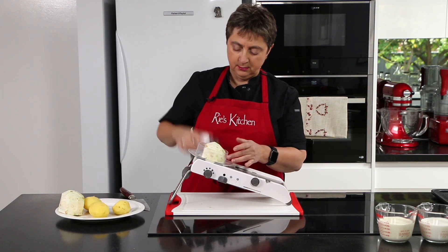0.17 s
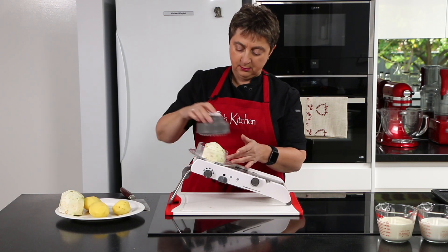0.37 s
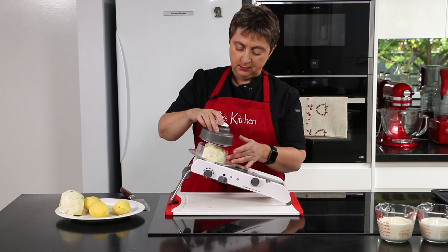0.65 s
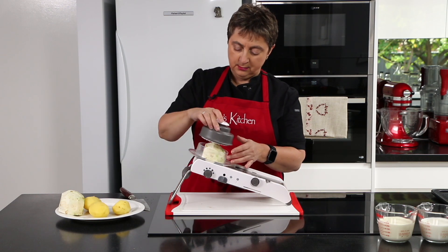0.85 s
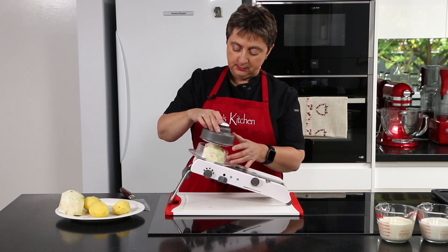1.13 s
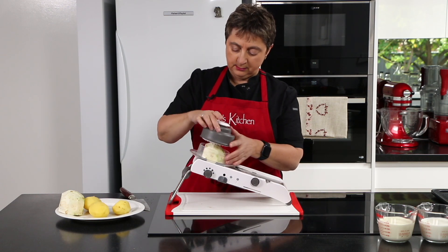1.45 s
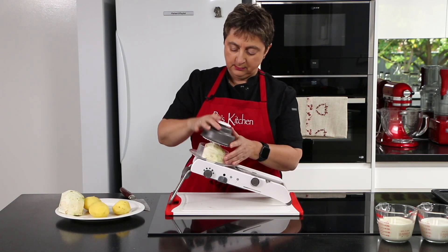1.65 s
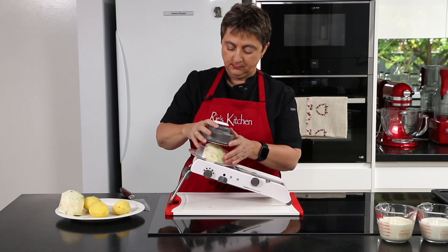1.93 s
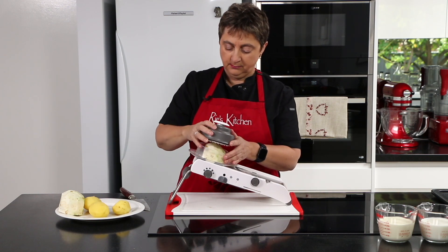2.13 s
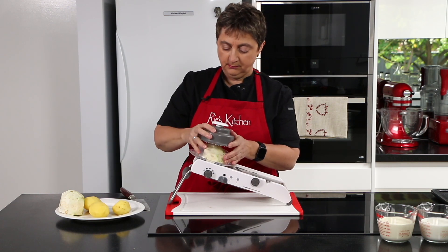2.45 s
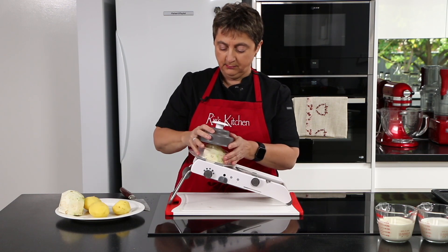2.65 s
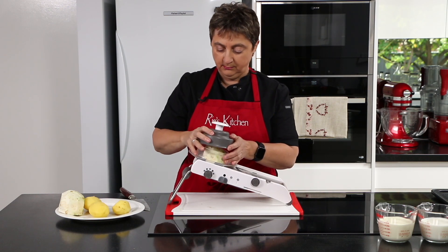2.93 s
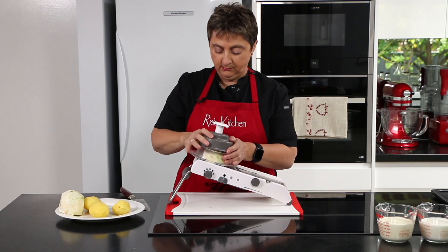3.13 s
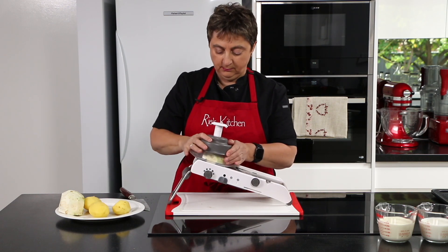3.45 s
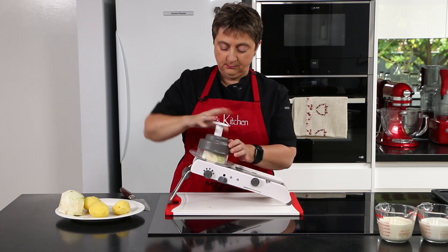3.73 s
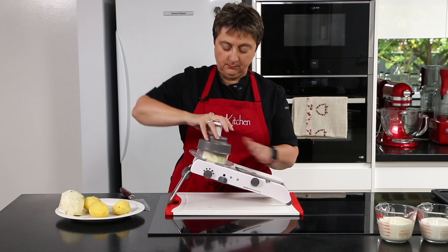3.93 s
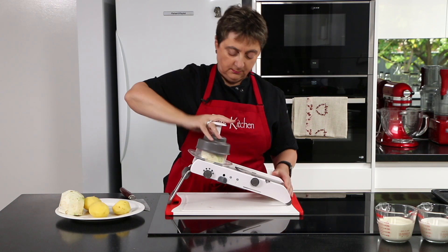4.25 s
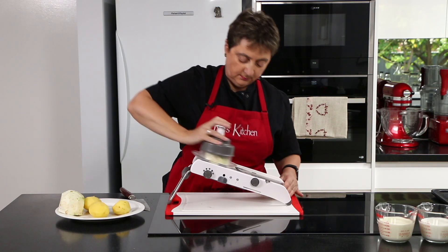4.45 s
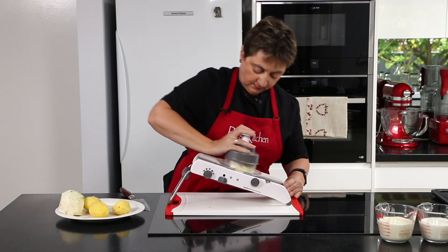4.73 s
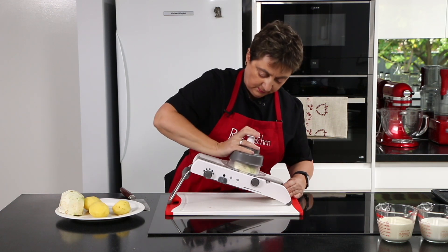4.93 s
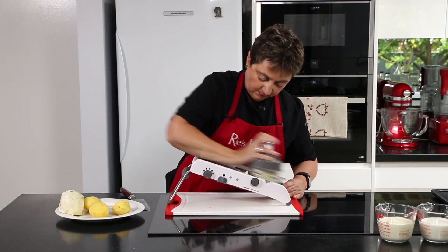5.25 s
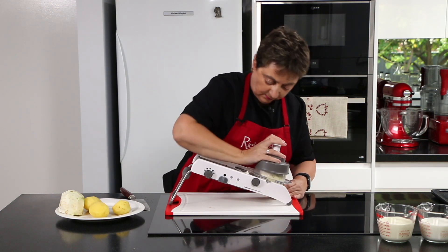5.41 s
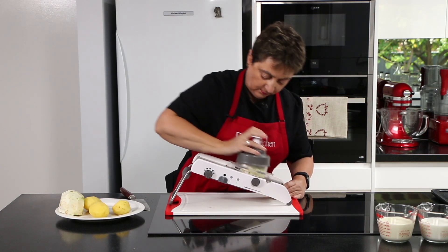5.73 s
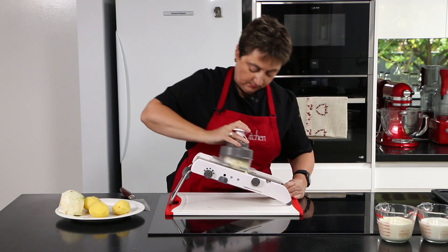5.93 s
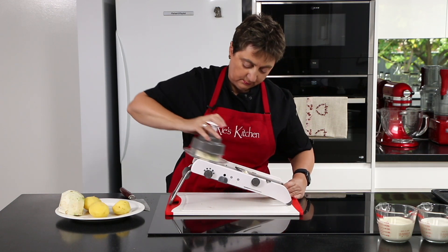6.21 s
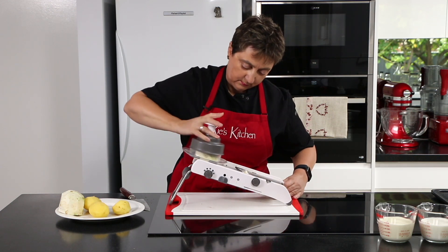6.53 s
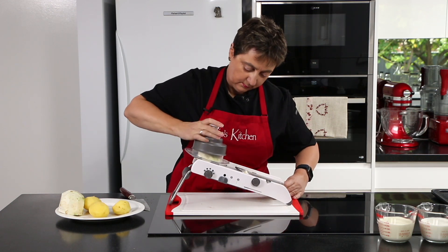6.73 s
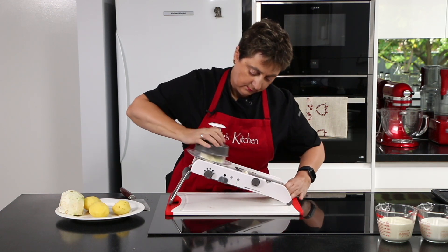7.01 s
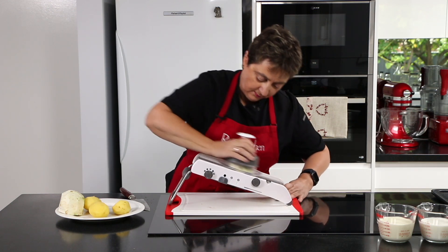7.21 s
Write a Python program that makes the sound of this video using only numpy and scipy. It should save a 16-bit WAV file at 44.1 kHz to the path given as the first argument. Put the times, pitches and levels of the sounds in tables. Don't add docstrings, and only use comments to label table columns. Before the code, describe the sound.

A quiet kitchen with a low, distant appliance hum and short hard-walled reverberation, heard closely. From 0 to 0.3 s a root vegetable slips softly on plastic; a clear click comes at 0.54, then very faint fingertip strokes around 0.9-1.2. A loud hollow plastic knock lands at 1.74, with light taps near 2.1 and a small skid at 2.55. Another slip at 3.03 precedes a loud scrape and snap at 3.35-3.37 as the guard is pressed on. From 3.8 to 5.1 small grip rattles mix with soft rubbing, growing raspier after 4.6. At 5.15-5.45 the push comes: sharp ticks, gritty rasp, very loud crunching knocks and low counter thuds. Crackles and knocks continue, standing out at 5.75, thinning by 6.4. Light clicks at 6.5-6.7 lead to a loud scraping clack at 6.86, then rattles and a rough bite at 7.25, with taps to the end.

```python
import sys
import numpy as np
from scipy import signal
from scipy.fft import rfft, irfft, next_fast_len
from scipy.io import wavfile
from scipy.ndimage import uniform_filter1d, map_coordinates

SR = 44100
rng = np.random.default_rng(int(sys.argv[2]) if len(sys.argv) > 2 else 0)


def digitize_waveform(pressure):
    field = np.atleast_2d(pressure).T
    bounded = np.clip(field, -1, 1)
    quanta = np.round(bounded * 32767).astype(np.int16)
    wavfile.write(sys.argv[1], SR, quanta)


def invert_db(x):
    u = np.asarray(x, float) / 20
    return 10 ** u


N = 325017


def unit(x):
    return x / np.sqrt(np.mean(x ** 2) + 1e-20)


def along(points, hz):
    f, v = np.transpose(points)
    return np.interp(np.log(hz + 1), np.log(f + 1), v)


def wobble(rate):
    knots = rng.standard_normal(int(N * rate / SR) + 4)
    return map_coordinates(knots, [np.arange(N) * rate / SR])


def filtered(x, response):
    m = next_fast_len(len(x) + 8192)
    return irfft(rfft(x, m) * response(np.fft.rfftfreq(m, 1 / SR)), m)[:len(x)]


def resonances(modes, f):
    total = 0
    for k, (centre, width, db) in enumerate(modes):
        damping = 1j * f * width
        total = total + (-1) ** k * invert_db(db) * damping / (centre ** 2 - f * f + damping + 1e-9)
    return total


def band(lo_hz, hi_hz):
    def response(f):
        rise = -f * f / (lo_hz ** 2 - f * f + 1.4j * f * lo_hz)
        fall = hi_hz ** 2 / (hi_hz ** 2 - f * f + 1.4j * f * hi_hz)
        return (rise * fall) ** 2
    return response


def lumps(t, depth_db):
    jumps = np.clip(rng.standard_normal(len(t) // 64), -1.5, 1.5)
    return invert_db(depth_db * jumps).repeat(64)


def blow(t, t60):
    return (1 - np.exp(-t / .0003)) * (invert_db(-60 * t / t60) + .6 * invert_db(-60 * t / .006))


def crunch(t, t60):
    return blow(t, t60) * lumps(t, depth_db=5) ** (t / (t + .004))


def skid(t, length):
    swell = np.sin(np.pi * np.clip(t / length, 0, 1)).clip(0) ** 0.54
    return swell * lumps(t, depth_db=3.5)


def rattling(rows, t60, halving_db):
    return [(*row, t60 * 2 ** (row[1] / halving_db)) for row in rows]


def rung(rows):
    return [(*row, 2500, length) for *row, length in rows]


def contacts(rows, body, shape, between_db, ring_db, loose):
    out, t = np.zeros(N + SR), np.arange(8192) / SR
    f = np.fft.rfftfreq(len(t), 1 / SR)
    registers = np.array([band(250, 1000)(f), band(1000, 4000)(f), band(4000, 11000)(f)])
    for s, db, dull_db, bright_db, hz, life in rows:
        force = shape(t, np.clip(life, .003, .17))
        burst = rfft(force * rng.standard_normal(len(t)))
        for _ in range(4):
            burst = rfft(force ** 0.26 * irfft(burst / np.abs(burst)))
        grip = loose * rng.standard_normal((len(body), 2))
        modes = [(c * (1 + d), max(w, c / 45), level + 40 * e) for (c, w, level), (d, e) in zip(body, grip)]
        modes.append((hz, hz * .06, ring_db))
        colour = invert_db(10 * loose ** .5 * map_coordinates(rng.standard_normal(40), [f / 700]))
        response = resonances(modes, f) + invert_db(between_db)
        parts = irfft(burst * colour * registers * response)
        parts *= t < .18
        peaks = invert_db(db - 1.5 + np.array([[dull_db], [0], [bright_db]]))
        parts *= peaks / np.abs(parts).max(axis=1, keepdims=True)
        out[round(s * SR):][:len(t)] += parts.sum(axis=0)
    return out[:N]


# (time [s], peak [dB], dull part [dB], bright part [dB], ring [Hz])
SLICE_TAPS = [(5.1516, -22, -5.5, -61, 2110), (5.3168, -12, -9, -15, 2480), (5.3218, -1.5, -13, -7.5, 2750),
              (5.359, -11, -4, -12.5, 2300), (5.3546, 1, -7.5, -5.5, 1312), (5.4124, -28, 12.5, 5, 692),
              (5.5593, -21, -6, -4.5, 3900), (5.5852, -27, -3, -38.5, 3000),
              (5.6028, -15, -8.5, -4.5, 2900), (5.6057, -18, 0, -18, 1050), (5.6158, -32, 4, -2, 960),
              (5.7071, -22.5, -6, -10, 2580), (5.7532, -8.5, -3.5, -0.5, 1430), (5.761, -23.5, 4, -8, 3400),
              (5.8124, -17, 5, 0.5, 1550), (5.92, -22, -5, -10, 1190), (5.9265, -25, -16, -11, 2100),
              (5.975, -29, -5, -12, 2400), (6.0033, -32, -8, -12, 2400), (6.0115, -22, -12, -5, 2500),
              (6.0305, -24, 0, -5.5, 2300), (6.039, -32, -2, -17, 800), (6.066, -31, -4, -3.5, 2580),
              (5.9487, -15, -12, -1.5, 890), (6.022, -14.5, -13, -1.5, 740),
              (6.0775, -17, -12.5, -4.5, 2300), (6.0927, -20, -13, -0.5, 920),
              (6.1802, -26.5, -3, -40, 896), (6.2281, -24.5, -6.5, -12.5, 1390),
              (6.2667, -31, 2.5, -33, 740), (6.2922, -32.5, -4, -6, 4740), (6.378, -36.5, -0.5, -8, 4560),
              (5.223, -18, -3, -10, 2900), (5.2481, -22, -9, -8, 1910), (5.2725, -12.5, -5, -10, 1860),
              (5.382, -23, -6, -6, 2300)]
# (centre [Hz], width [Hz], level [dB])
RAMP = [(645, 320, -4), (1400, 630, 8), (2635, 1470, 5), (4390, 1600, 16), (5530, 6600, 9.5)]


def slicing_taps():
    rows = rattling(SLICE_TAPS, t60=.057, halving_db=30.5)
    return contacts(rows, RAMP, crunch, between_db=-4, ring_db=11.5, loose=.05)


# (time [s], peak [dB], dull part [dB], bright part [dB], length [s])
BITES = [
    (5.7465, -17.5, -4, -7, 0.0048),
    (5.772, -34, 5.5, -15.5, 0.029),
    (5.953, -20, -6, -7, 0.012),
    (6.08, -23, -1, -3, 0.02),
    (7.24, -14.5, -5.5, -5, 0.029),
    (7.266, -21, -10, -5, 0.05),
]


def bites():
    return contacts(rung(BITES), RAMP, skid, between_db=0, ring_db=-40, loose=.05)


# (middle [s], length [s], rasp [dB], hiss over rasp [dB], drag over rasp [dB])
STROKES = [(0.05, 0.41, -57.5, -7.5, 9.5), (0.468, 0.35, -58.5, -3.5, 0.5), (2.415, 0.65, -67.5, 0.5, 5.5),
           (3.75, 0.72, -62, -8, -2), (4.02, 0.4, -51.5, -2.5, 3), (4.31, 0.32, -53.5, -6, 2),
           (4.616, 0.21, -37, -5, -3), (4.835, 0.12, -36.5, -4.5, -6), (5.004, 0.24, -51, -6, 4.5),
           (5.223, 0.15, -37.5, -4.5, -14), (5.31, 0.23, -35.5, -2, 5), (5.445, 0.12, -57, -5, 16),
           (5.95, 0.38, -41, -24, 2.5), (6.222, 0.27, -43, -6.5, 0), (6.608, 0.29, -52.5, -10, 7.5),
           (6.852, 0.053, -39.5, -10, 2), (7.254, 0.23, -34.5, -5, -1)]
# (frequency [Hz], density [dB per Hz])
HISS = [(2060, -31), (3500, -7.5), (5870, -5), (6800, -6), (7630, -9.5), (14300, -17.5), (16100, -18)]


def grit(spiky_db):
    jumps = np.clip(rng.standard_normal(N // 40 + 1), -2, 2)
    sizes = invert_db(spiky_db * jumps).repeat(40)[:N]
    return unit(sizes * rng.standard_normal(N))


def rasp():
    time = np.arange(N) / SR
    levels = np.zeros((3, N))
    for s, length, db, hiss_db, drag_db in STROKES:
        edge_loss_db = 12 * np.abs(2 * (time - s) / length) ** 2.33
        levels += invert_db(db - 5.0 - edge_loss_db) * invert_db(np.array([[0], [hiss_db], [drag_db]]))
    judder = 2.3 * wobble(60) + 1.2 * wobble(14)
    fibres = grit(spiky_db=4.5)

    def mid_response(f):
        return (resonances([(1550, 77, -7.0), (2300, 160, 8.5)], f) + invert_db(2.0)) * band(1000, 4000)(f)

    def high_response(f):
        return invert_db(along(HISS, f)) * band(3500, 18000)(f)

    def low_response(f):
        return (resonances([(810, 75, 0.0057)], f) + invert_db(-2)) * band(200, 1000)(f)

    mid = filtered(fibres, mid_response)
    high = filtered(fibres, high_response)
    low = filtered(grit(spiky_db=4.5), low_response)
    out = np.zeros(N)
    for level, x in zip(levels, (mid, high, low)):
        out += level * unit(invert_db(judder + 1.52 * wobble(30)) * x)
    return out


# (time [s], peak [dB], dull part [dB], bright part [dB], length [s])
SLIPS = [(0.038, -35, 6, -13.5, 0.0425), (0.048, -33, -5, -19, 0.02), (0.189, -43, -15, -4.5, 0.054),
         (0.214, -47, -11, 1.5, 0.037), (0.5327, -34.5, -8, -4, 0.022), (1.52, -48.5, 2.5, -4, 0.042),
         (2.5507, -31, -2, -5.5, 0.051), (3.0313, -21, -2, -10, 0.056), (5.164, -26, -2, -29, 0.0081),
         (5.178, -33, 9, 7, 0.017), (5.2, -20.5, -8.5, -3, 0.046), (5.243, -25.5, -1, -1, 0.02),
         (5.27, -16.5, -11.5, -7, 0.03), (5.327, -23, -24, -11, 0.067), (5.9195, -31, -2, -6, 0.025)]
# (centre [Hz], width [Hz], level [dB])
SKID = [(800, 170, -0.5), (1950, 250, 3), (3900, 1100, -13.5), (5410, 670, -4.5)]


def root_slips():
    return contacts(rung(SLIPS), SKID, skid, between_db=-14, ring_db=-23, loose=.04)


# (time [s], peak [dB], dull part [dB], bright part [dB], ring [Hz])
GUARD_TAPS = [
    (0.4594, -49.5, -12, 6.5, 584),
    (0.5432, -26.5, -16, -5, 2400),
    (0.9108, -49.5, 6.5, -9, 930),
    (1.5546, -50, 7, -15, 740),
    (1.7, -68, 6, 19, 800),
    (1.739, -5, -16.5, -6, 1750),
    (2.0992, -44, -7, -23, 810),
    (2.1166, -40.5, 8.5, 4, 900),
    (2.498, -44, -25, -21, 2540),
]
# (centre [Hz], width [Hz], level [dB])
GUARD = [(645, 150, -16.5), (880, 160, 0.5), (1170, 110, -5.5), (1583, 75, 1.5), (2040, 90, -14.5),
         (2650, 130, -7.5), (3000, 140, -8), (3790, 85, 4.5), (4400, 150, -10), (5720, 400, -2.5),
         (6530, 200, -4), (7250, 140, -2.5), (8290, 170, -12.5), (9270, 200, -5.5)]


def guard_taps():
    rows = rattling(GUARD_TAPS, t60=.027, halving_db=12.6)
    return contacts(rows, GUARD, blow, between_db=-19, ring_db=-12, loose=.004)


# (time [s], peak [dB], dull part [dB], bright part [dB], ring [Hz])
PRESS_TAPS = [
    (2.8303, -39.5, -12, -5.5, 1760),
    (2.8654, -43.5, -3.5, -2, 1850),
    (3.2076, -32.5, -9, -5.5, 3200),
    (3.3674, -8, -3.5, -13.5, 740),
    (3.3704, -2, -6, -1.5, 1330),
    (3.6532, -41, -16, 5.5, 1400),
]
# (centre [Hz], width [Hz], level [dB])
PRESSED = [(383, 230, -12.5), (560, 180, -6.5), (749, 62, -0.5), (990, 160, -4), (1278, 110, -5),
           (1420, 93, 4.5), (2013, 180, -2), (2235, 66, -0.5), (2820, 720, -26), (3423, 66, -3.5),
           (3990, 165, -9.5), (4910, 200, -4), (5930, 340, -12), (8600, 1400, -11.5)]


def press_taps():
    rows = rattling(PRESS_TAPS, t60=.062, halving_db=400)
    return contacts(rows, PRESSED, blow, between_db=-20, ring_db=-3, loose=.004)


# (time [s], peak [dB], dull part [dB], bright part [dB], length [s])
PRESS_SLIPS = [
    (3.3515, -12, -2.5, -10.5, 0.038),
]


def press_slips():
    return contacts(rung(PRESS_SLIPS), PRESSED, skid, between_db=-20, ring_db=-40, loose=0)


# (time [s], peak [dB], dull part [dB], bright part [dB], ring [Hz])
GRIP_TAPS = [(3.8287, -52, -7, 9, 687), (3.8671, -19.5, -2.5, -5, 987), (3.9923, -34.5, -2.5, -18, 950),
             (4.0836, -30, -0.5, 4.5, 740), (4.2482, -33, -3, -10, 1930), (4.336, -33.5, -1, 8, 2300),
             (4.3994, -48, -1, -19, 800), (4.4767, -35, -8.5, -17, 760), (4.5106, -37.5, -15, -8, 1920),
             (4.576, -37, -2, -15, 790), (4.6573, -31, 4.5, -9.5, 870), (4.8319, -32, -15, -5, 2480),
             (4.8564, -47, -5, 14, 595), (4.9671, -54, 6, -3, 825), (5.0399, -58, -11, -15, 785),
             (5.1118, -40, -3, -9, 810)]
# (centre [Hz], width [Hz], level [dB])
GRIPPED = [(740, 74, 6.5), (1400, 240, 7.5), (2100, 300, 5), (3260, 150, 5), (4380, 410, -1.5),
           (7350, 360, -5.5)]


def grip_taps():
    rows = rattling(GRIP_TAPS, t60=.064, halving_db=43)
    return contacts(rows, GRIPPED, blow, between_db=-15.5, ring_db=11.0, loose=.015)


# (time [s], peak [dB], dull part [dB], bright part [dB], ring [Hz])
RESET_TAPS = [(6.4622, -39, -2, -5.5, 690), (6.5026, -21.5, -28, 2, 854), (6.5261, -29.5, -2, -20, 1340),
              (6.5364, -27.5, -16, 0, 850), (6.6323, -35, 6.5, -6, 790), (6.6548, -22, -6.5, -11, 750),
              (6.6752, -25, -9, -1.5, 710), (6.8508, -17, -4, -8, 2020), (6.8612, -5.5, -7.5, -9, 1150),
              (6.8785, -15, -1.5, -4, 1400), (7.0424, -48, 6, 9, 800), (7.0738, -25, -31, -9, 690),
              (7.0974, -19.5, -3, 2.5, 755), (7.104, -33.5, 5, 1, 785), (7.1432, -28, -3, -18.5, 2020),
              (7.1964, -36, -2, -15, 1420), (7.2508, -22, -1, 4, 980), (7.2572, -16.5, -4, 0.5, 1060),
              (7.29, -24, -9, -8, 3300), (7.3032, -26, -6, 2.5, 1220), (7.3145, -29, -3, 4, 1710),
              (7.366, -15.5, -3.5, -21, 746), (7.3386, -26, -15, -7, 2520), (7.358, -30, 7, -25, 795)]
# (centre [Hz], width [Hz], level [dB])
FRAME = [(737, 79, 5.5), (987, 145, 0.5), (1165, 95, -3.5), (1400, 195, 0), (1977, 540, -8),
         (2900, 170, -6.5), (4024, 330, -5.5), (5600, 480, 0.5), (8930, 1500, -24)]


def reset_taps():
    rows = rattling(RESET_TAPS, t60=.017, halving_db=130)
    return contacts(rows, FRAME, blow, between_db=-11, ring_db=8, loose=.015)


# (time [s], peak [dB], dull part [dB], bright part [dB], length [s])
FRAME_SLIPS = [
    (6.847, -6, -3.5, -5.5, 0.022),
    (6.869, -14.5, -2.5, -15.5, 0.019),
    (7.0735, -26.5, 1, -0.5, 0.024),
]


def frame_slips():
    return contacts(rung(FRAME_SLIPS), FRAME, skid, between_db=-15, ring_db=-40, loose=0)


# (time [s], peak [dB], ring [Hz], length [s])
DRAGS = [
    (.85, -56, 1550, 0.2),
    (.95, -56.5, 1463, 0.35),
    (1.04, -61.5, 1550, 0.088),
    (2.47, -50.5, 1950, 0.059),
]


def finger_drags():
    dull_db, bright_db = -15, -22
    rows = [(s, db, dull_db, bright_db, hz, length) for s, db, hz, length in DRAGS]
    return contacts(rows, [], skid, between_db=-22, ring_db=0, loose=0)


# (time [s], peak [dB], pitch [Hz], t60 [s])
PIPS = [(.052, -40, 788, 0.2), (.05, -34, 343, 0.089), (3.977, -38, 150, 0.054),
        (0.059, -34.5, 1950, 0.045), (0.543, -32.5, 2365, 0.062), (0.542, -32, 2980, 0.015),
        (.546, -41, 900, 0.13), (2.575, -45, 895, 0.35), (0.543, -32.5, 3650, 0.034),
        (0.543, -30, 3940, 0.034), (2.099, -40, 1850, 0.043), (2.099, -41, 2300, 0.026),
        (4.249, -35, 1550, 0.03), (4.249, -39, 2200, 0.03), (5.1652, -7, 2140, 0.005),
        (5.785, -28, 800, 0.049), (5.83, -28, 784, 0.1), (6.283, -29, 2150, 0.013),
        (6.503, -23, 4870, 0.014), (6.527, -31, 4800, .012), (6.655, -30, 5600, .012),
        (4.658, -31, 2700, .015), (4.577, -40, 2000, .012), (7.075, -26, 4960, 0.012),
        (7.089, -26, 4930, 0.017), (7.242, -23.5, 2700, 0.023), (2.099, -41.5, 840, 0.099),
        (3.005, -35, 886, 0.095), (3.868, -31, 1010, 0.16), (3.867, -40, 3190, 0.1),
        (5.162, 5, 2160, 0.0032), (5.188, -1.5, 2120, 0.0041), (5.2102, 0, 2100, 0.0028),
        (5.815, -19.5, 1596, 0.045), (6.307, -30, 2180, 0.024), (6.38, -40, 743, 0.1),
        (6.862, -3, 5850, 0.0085)]


def pips():
    out, t = np.zeros(N + SR), np.arange(SR // 8) / SR
    for s, db, hz, t60 in PIPS:
        envelope = invert_db(db - 60 * t / t60) * (1 - np.exp(-t * hz))
        out[round(s * SR):][:len(t)] += envelope * np.sin(2 * np.pi * hz * t)
    return out[:N]


# (time [s], level [dB])
JOLTS = [(.06, -61), (.22, -57), (0.549, -49), (.94, -55.5), (1.56, -64), (2.13, -64), (2.611, -53.5),
         (3.069, -47.5), (3.24, -56), (3.385, -37), (3.991, -51.5), (4.67, -47.5), (4.84, -44),
         (5.171, -36), (5.379, -29.5), (5.46, -34.5), (5.65, -44), (5.8, -39.5), (5.95, -43.5),
         (6.089, -38), (6.29, -48), (6.53, -49), (6.68, -48), (6.87, -46), (7.1, -53.5), (7.26, -40.5),
         (7.36, -50)]
# (centre [Hz], width [Hz], level [dB])
COUNTER = [(67.3, 11.5, -2.5), (130.6, 15.6, -4.5), (236, 230, -13)]


def rocking():
    time = np.arange(N) / SR
    rise_s, fall_s = .14, .28
    swing = np.full(N, invert_db(-76))
    for s, db in JOLTS:
        swing += invert_db(db - 60 * np.maximum((s - time) / rise_s, (time - s) / fall_s))
    shake = filtered(rng.standard_normal(N), lambda f: resonances(COUNTER, f) * band(38, 250)(f))
    steady = shake / np.sqrt(np.abs(uniform_filter1d(shake ** 2, size=SR // 30)) + 1e-12)
    return swing * unit(steady)


# (frequency [Hz], t60 [s])
KITCHEN = [(100, 0.32), (500, 0.7), (2000, 0.69), (5000, 0.55), (10000, 0.4), (16000, 0.24)]


def kitchen(x):
    out, step = np.zeros(N + 2 * SR), SR // 3
    for start in range(0, N, step):
        hz, t, z = signal.stft(rng.standard_normal(SR * 3 // 4), SR, nperseg=256)
        t60 = np.maximum(along(KITCHEN, hz), .05)[:, None]
        tail = signal.istft(z * invert_db(-60 * t / t60), SR, nperseg=256)[1]
        wet = signal.fftconvolve(x[start:start + step], tail / np.linalg.norm(tail))
        out[start + 250:][:len(wet)] += wet
    return out[:N]


# (frequency [Hz], density [dB per Hz])
AIR = [(25, -26.5), (100, -1.5), (190, 12), (452, 2), (890, -2.5), (1140, -11), (2000, -11), (16100, -24.5)]


def air():
    hum = filtered(rng.standard_normal(N), lambda f: invert_db(along(AIR, f)))
    return invert_db(-59.5 + wobble(3.46)) * unit(hum)


def scene():
    slicer = slicing_taps() + bites() + rasp() + root_slips()
    slicer += guard_taps() + press_taps() + press_slips() + grip_taps()
    slicer += reset_taps() + frame_slips() + finger_drags()
    plucked = pips()
    walls = kitchen(slicer + filtered(plucked, band(200, 4500)))
    return (slicer + plucked + invert_db(-11.5) * walls + rocking() + air())[None]


def band_limit(x):
    return signal.sosfilt(signal.butter(12, 16260, fs=SR, output="sos"), x)


def record(dry):
    heard = filtered(dry[0], lambda f: 1 / (1 + (f / 14500) ** 6) ** .5)[None]
    mix = heard / (1 + np.abs(heard) ** 8) ** (1 / 8)
    return band_limit(mix)


dry = scene()
out = record(dry)
digitize_waveform(out)
```